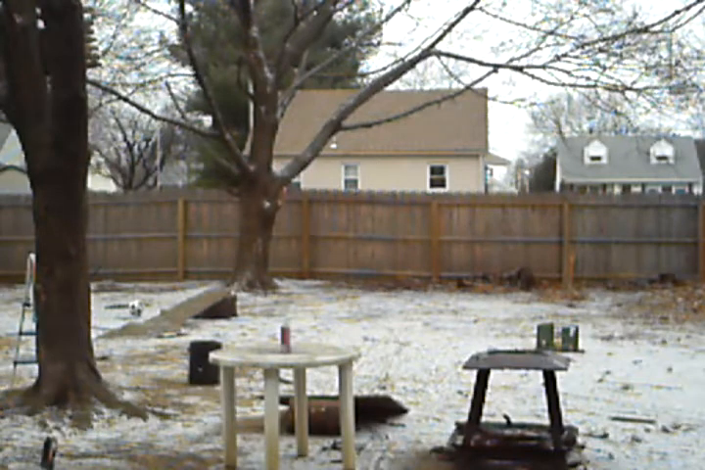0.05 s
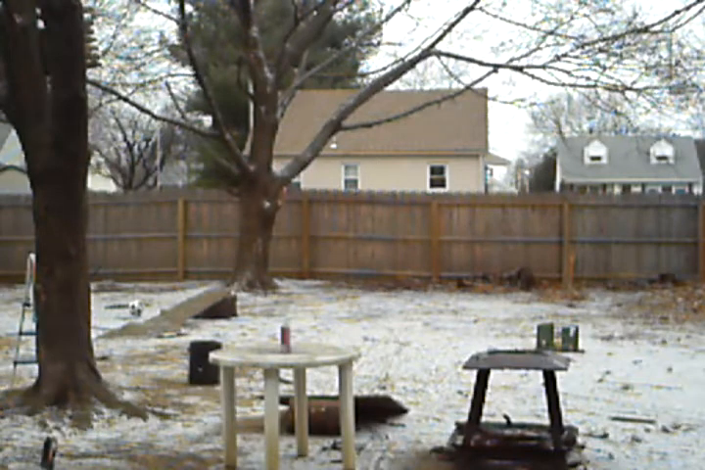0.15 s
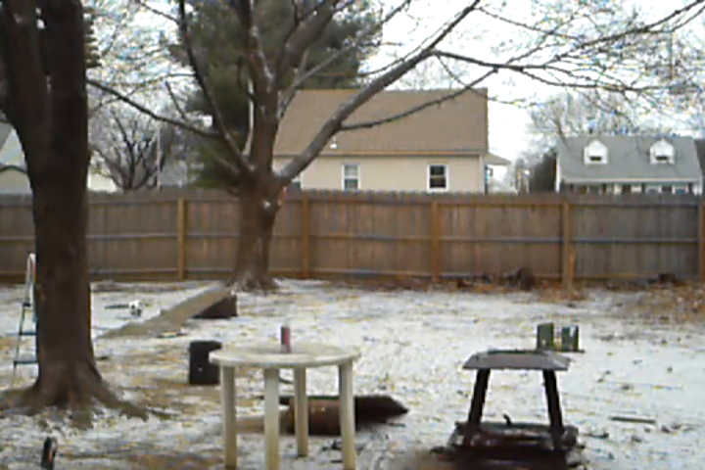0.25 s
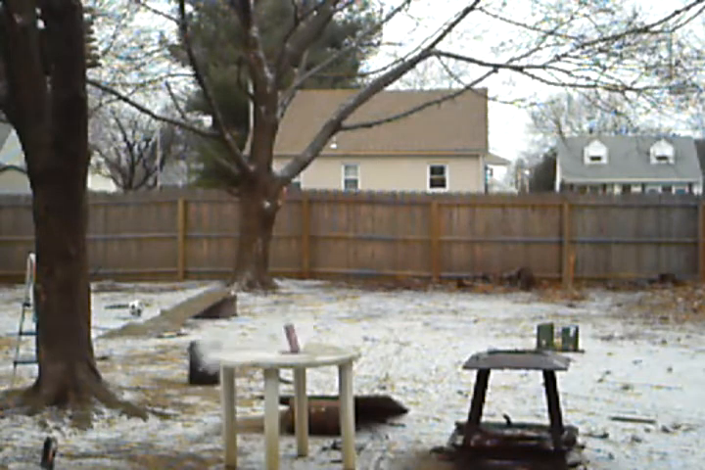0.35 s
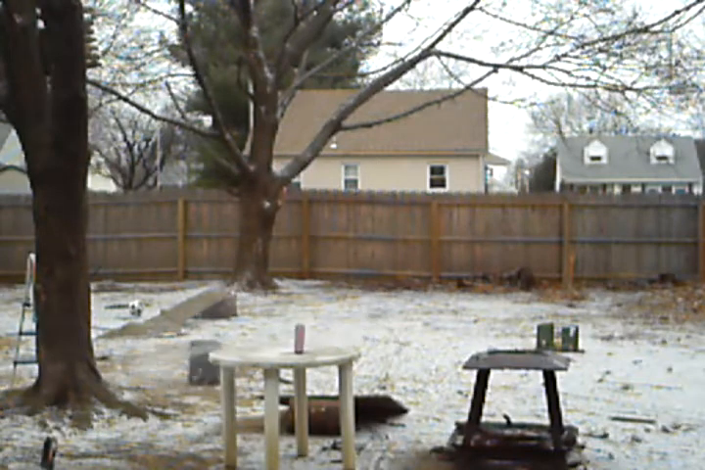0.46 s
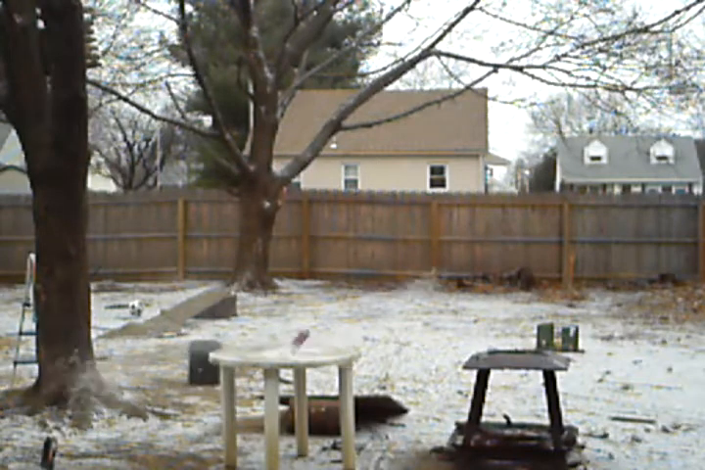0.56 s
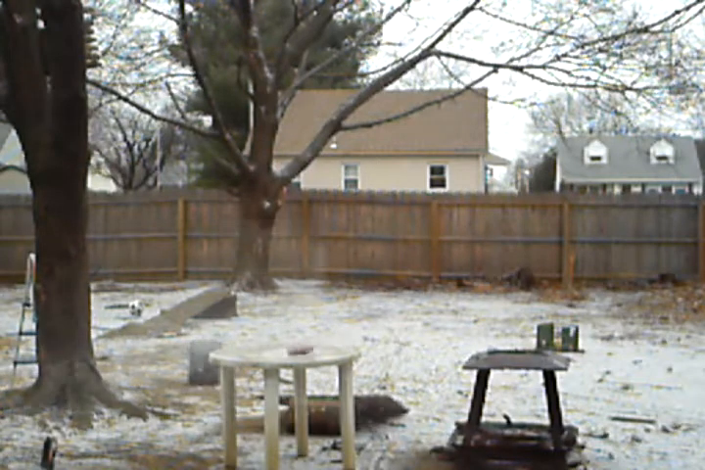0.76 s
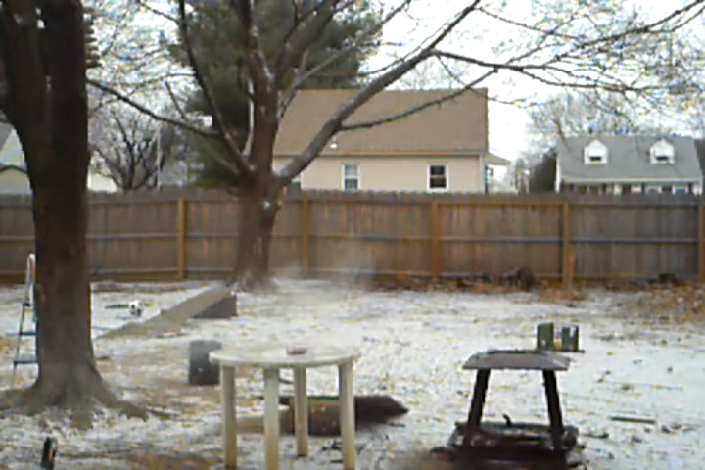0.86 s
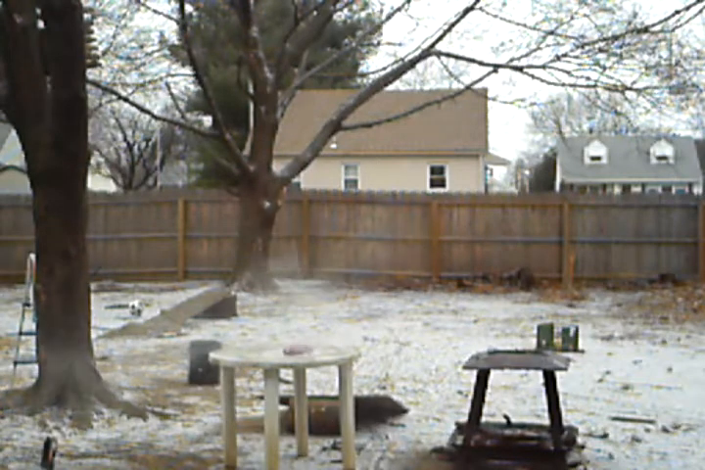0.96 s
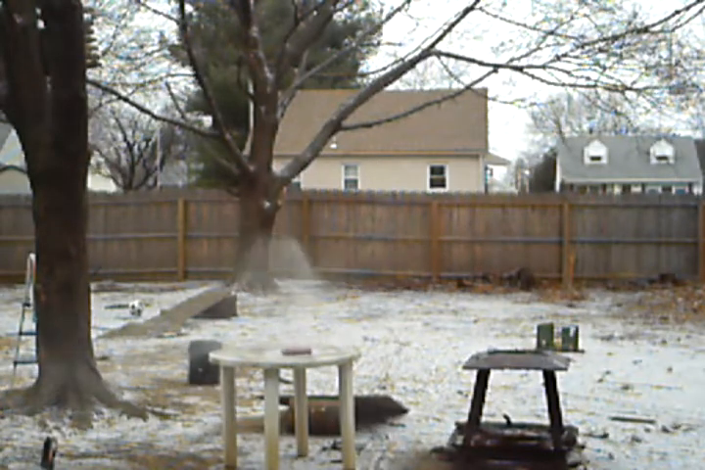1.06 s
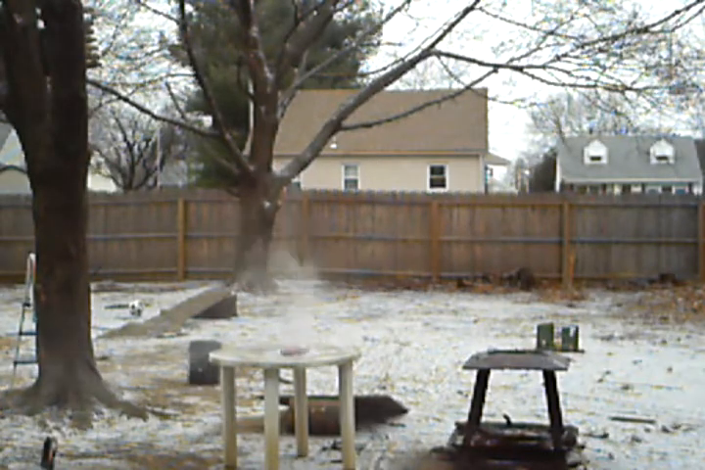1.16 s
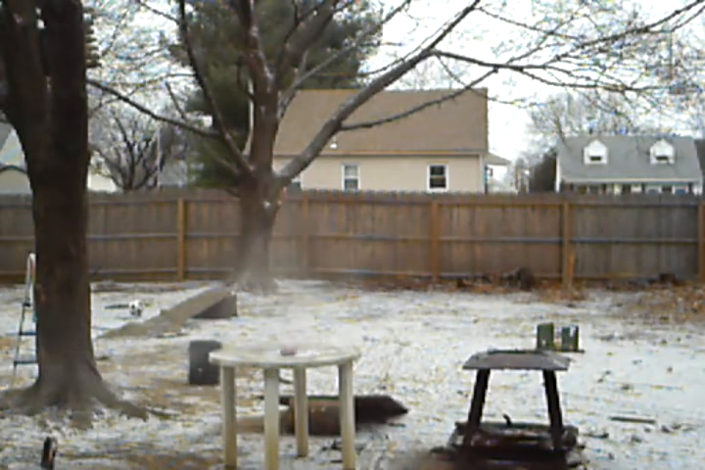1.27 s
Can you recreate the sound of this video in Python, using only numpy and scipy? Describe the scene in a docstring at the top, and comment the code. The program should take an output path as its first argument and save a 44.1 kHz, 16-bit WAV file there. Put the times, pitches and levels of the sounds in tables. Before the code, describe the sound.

Loud air rifle crack in an open back yard, slapping off fence and houses and fading quickly; a thin gas hiss, two light hollow can knocks and a dull crunch follow, on a dull, clipping microphone.

```python
"""Snowy back yard: a spring air gun is fired at an aerosol can standing on a plastic table.
The trigger ticks; lead-in noise, crack and echoes off fence and houses are shaped noise with pressure pulses.
The pierced can hisses (coloured noise), tips over and knocks on the table (ringing modes, clattering grains).
A dull crunch of ringing grains follows, over faint air noise and a wavering hum.
A narrow-band microphone overloads on the crack."""
import sys
import numpy as np
from scipy import signal
from scipy.io import wavfile

SR = 44100
rng = np.random.default_rng(int(sys.argv[2]) if len(sys.argv) > 2 else 0)


def transcribe(u):
    """Save the signal u as a 16-bit wav file named by the first command-line argument.

    u: samples, shape (n,) or (channels, n), limited to [-1, 1]; the rate is SR.
    q: integer samples, one column per channel.
    """
    v = np.clip(np.atleast_2d(u).T, -1, 1)
    q = np.round(v * 32767).astype(np.int16)
    wavfile.write(sys.argv[1], SR, q)


N = 57330
TIME_S = np.arange(N) / SR


def from_db(db):
    """Decibels to amplitude gain."""
    return 10 ** (np.asarray(db) / 20)


def rms_one(x):
    """Scale to rms 1."""
    return x / np.sqrt(np.mean(x ** 2) + 1e-20)


def level(rows, start_s):
    """Gain curve from (time_s, level_db) rows, faded in over 44 ms from start_s."""
    time_s, level_db = np.transpose(rows)
    fade_in = np.clip((TIME_S - start_s) / 0.044, 0, 1)
    return from_db(np.interp(TIME_S, time_s, level_db)) * fade_in


def at_hz(points, hz):
    """Interpolate a (hz, value) table on a log-frequency axis."""
    table_hz, value = np.array(points).T
    return np.interp(np.log(hz), np.log(table_hz), value)


def dying(start_s, t60_s, rise_s=0.00054):
    """Linear rise times exponential decay, 60 dB per t60_s."""
    age_s = np.maximum(TIME_S - start_s, 0)
    return np.clip(age_s / rise_s, 0, 1) * from_db(-60 * age_s / t60_s)


def drift(rate_hz):
    """Slow random wander: noise through a two-pole lowpass, rms 1 after its first second is dropped."""
    pole = np.exp(-2 * np.pi * rate_hz / SR)
    wander = signal.lfilter([1], [1, -2 * pole, pole * pole], rng.standard_normal(N + SR))
    return rms_one(wander[SR:])


def white():
    """White noise, rms about 1."""
    return rng.standard_normal(N)


def grains(per_s, spread_db):
    """Random clicks of uneven size and either sign; rms 1."""
    sizes = from_db(spread_db * np.minimum(rng.exponential(1, N), 4))
    signed = sizes * rng.choice([-1, 1], N)
    return rms_one(signed * (rng.random(N) < per_s / SR))


def ring(clicks, hz, t60_s):
    """Two-pole resonator: a unit click starts a decaying sine of height 1."""
    radius, angle = from_db(-60 / (t60_s * SR)), 2 * np.pi * hz / SR
    feedback = [1, -2 * radius * np.cos(angle), radius * radius]
    return signal.lfilter([0, np.sin(angle)], feedback, clicks + 1e-18)


def ringing_grains(per_s, low_hz, high_hz, cycles):
    """Uneven grains dealt to twelve resonances, each dying 60 dB in the given cycles; rms 1."""
    clicks, dealt = grains(per_s, 1.6), rng.integers(0, 12, N)
    pitches_hz = np.geomspace(low_hz, high_hz, 12)
    rings = sum(ring(clicks * (dealt == k), hz, cycles / hz) for k, hz in enumerate(pitches_hz))
    band = signal.butter(2, [0.76 * low_hz, 1.47 * high_hz], "band", fs=SR, output="sos")
    return rms_one(signal.sosfilt(band, rings))


def coloured(source, spectrum, shape=lambda hz: 1):
    """Colour two unrelated draws by half-octave bands, each shaped in time; near rms 1 at shape 1."""
    edges_hz = 20 * 2 ** np.arange(0, 9, .5)
    draws, out, power = [source(), source()], 0, 0
    for k, (low, high) in enumerate(zip(edges_hz, edges_hz[1:])):
        centre_hz = np.sqrt(low * high)
        gain = from_db(at_hz(spectrum, centre_hz))
        band = signal.butter(2, [low, high], "band", fs=SR, output="sos")
        out = out + gain * signal.sosfilt(band, draws[k % 2] * shape(centre_hz))
        power += gain ** 2 * (min(high, 6000) - min(low, 6000)) * 2 / SR  # counts only up to 6 kHz
    return out / np.sqrt(power)


# air noise spectrum: hz, relative_db_per_hz
AIR_SPECTRUM = [(12, -37), (20, -5.5), (129, -2), (148, -32), (202, -3), (270, -9.5), (700, -17.5),
                (889, -15.5), (2480, -25), (6000, -27), (7800, -79.5), (13200, -120)]
AIR_DB = -44.5


def air():
    """Background air: coloured noise, each band wandering in level."""
    return from_db(AIR_DB) * coloured(white, AIR_SPECTRUM, lambda hz: from_db(2.54 * drift(5.9)))


# hum level: time_s, rms_db
HUM_LEVEL = [(0.0, -40), (0.1, -69), (0.126, -44.5), (0.17, -47), (0.256, -44), (0.3, -45), (0.626, -40.5),
             (0.724, -52.5), (0.84, -42), (0.944, -54), (1.086, -56.5), (1.114, -66), (1.266, -68),
             (1.3, -64)]
HUM_HZ, HUM_WAVER_RATIO = 55, .04


def hum():
    """Low sine, wavering in pitch and level."""
    pitch_hz = HUM_HZ * (1 + HUM_WAVER_RATIO * drift(15))
    tone = np.sin(2 * np.pi * np.cumsum(pitch_hz) / SR)
    return np.sqrt(2) * level(HUM_LEVEL, -1) * tone  # sounding from the start


# dull crunch level: time_s, rms_db
CRUNCH_LEVEL = [(1.07, -50), (1.08, -52), (1.102, -46), (1.128, -44.5), (1.196, -37.5), (1.212, -44),
                (1.234, -35), (1.272, -47.5), (1.29, -35), (1.3, -39)]
# crunch resonances: pitch_hz, relative_db, t60_s
CRUNCH_MODES = [(112, -10, 0.063), (225.4, -8, 0.18), (320, 0.5, .05), (410, -2.5, .06), (479, 1, 0.047),
                (511, 3.5, 0.072), (669, -4, 0.069), (785, -9, 0.067), (1450, -8, .025)]
CRUNCH_GRAINS_PER_S = 900


def crunch():
    """Uneven grains, each exciting a random half or so of the dull resonances."""
    clicks = grains(CRUNCH_GRAINS_PER_S, 1.6)
    dealt = rng.random((len(CRUNCH_MODES), N)) < .5
    rings = sum(from_db(db) * ring(clicks * chosen, hz, t60_s)
                for chosen, (hz, db, t60_s) in zip(dealt, CRUNCH_MODES))
    return level(CRUNCH_LEVEL, 1.06) * rms_one(rings)


# can venting level: time_s, level_db
GAS_LEVEL = [(0.42, -38.5), (0.454, -50.5), (0.498, -42.5), (0.564, -47.5), (0.696, -45.5), (1.02, -48.5),
             (1.046, -53.5), (1.258, -47.5), (1.3, -56)]
# jet spectrum: hz, relative_db_per_hz
JET_SPECTRUM = [(180, -46), (300, -23), (410, -29), (437, -3), (477, 7), (927, -2), (4910, 6), (6000, 3),
                (7800, -42), (13200, -120)]
GAS_START_S = 0.353


def gas_hiss():
    """Gas jet of the pierced can: coloured turbulence noise, bands wandering in level."""
    jet = coloured(white, JET_SPECTRUM, lambda hz: from_db(1.0 * drift(6.5)))
    return level(GAS_LEVEL, GAS_START_S) * jet


# can rocking and rolling: start_s, rms_db, t60_s
CLATTERS = [(.482, -45, 0.13), (0.683, -38, 0.25), (.731, -44, 0.32), (1.06, -41.5, 1)]
RATTLE_PER_S, RATTLE_LOW_HZ, RATTLE_HIGH_HZ, RATTLE_CYCLES = 3600, 664, 1914, 4.7


def clatter():
    """Rocking, rolling can: dense ringing grains under decaying envelopes."""
    envelope = sum(from_db(db) * dying(start_s, t60_s, 0.001) for start_s, db, t60_s in CLATTERS)
    return envelope * ringing_grains(RATTLE_PER_S, RATTLE_LOW_HZ, RATTLE_HIGH_HZ, RATTLE_CYCLES)


# can knocks on the table: start_s, relative_db, pitch_hz
KNOCKS = [(.483, -30, 1240), (.6762, -21.5, 1148), (0.6792, -25.5, 1177), (0.73, -37, 1430),
          (1.0587, -21.5, 1084), (1.063, -28, 1140)]
# can and table modes: pitch_ratio, relative_db, t60_s
CAN_MODES = [(.66, -11, .015), (.82, -5, .02), (1.0, 0, .028), (1.2, -4, .022), (1.5, -9, .015)]


def knocks():
    """Each impact click rings the modes of can and table, alternating in sign."""
    out = np.zeros(N)
    for start_s, knock_db, pitch_hz in KNOCKS:
        click = 1. * (np.arange(N) == int(start_s * SR))
        rings = sum((-1) ** k * from_db(mode_db) * ring(click, pitch_hz * ratio, t60_s)
                    for k, (ratio, mode_db, t60_s) in enumerate(CAN_MODES))
        out += from_db(knock_db - 4.5) * rings
    return out


TRIGGER_S, TRIGGER_DB, TRIGGER_RISE_S, TRIGGER_T60_S = .1865, -26, 0.0029, 0.025
TRIGGER_HZ, TRIGGER_WIDTH_HZ, TRIGGER_RING_DB = 3880, 220, 11.5
TRIGGER_THUD_DB, TRIGGER_THUD_HZ = -43.5, 800


def trigger():
    """Bright noise tick through one broad metal resonance, plus a dull, slower-dying stir of the action."""
    burst = white() * dying(TRIGGER_S, TRIGGER_T60_S, TRIGGER_RISE_S)
    b, a = signal.iirpeak(TRIGGER_HZ, TRIGGER_HZ / TRIGGER_WIDTH_HZ, fs=SR)
    tick = burst + from_db(TRIGGER_RING_DB) * signal.lfilter(b, a, burst)
    b, a = signal.butter(2, [TRIGGER_THUD_HZ / 2, TRIGGER_THUD_HZ * 2], "band", fs=SR)
    thud = rms_one(signal.lfilter(b, a, white())) * dying(TRIGGER_S, 0.63, 0.012)
    return from_db(TRIGGER_DB) * tick + from_db(TRIGGER_THUD_DB) * thud


# late slaps off metal and far walls: start_s, relative_db, t60_s
SLAPS = [(0.3678, -15, 0.026), (0.3746, -16, 0.041), (0.411, -18.5, 0.035), (0.4123, -23, 0.02),
         (0.4788, -21, 0.016)]
# slap resonances: pitch_hz, width_hz, relative_db
SLAP_MODES = [(953, 35, 4), (1260, 75, 5), (2110, 52, 1), (2414, 40, 3), (2720, 35, 1), (3020, 36, -4),
              (3950, 87, -18.5), (4470, 91, -2), (4900, 190, 3.5)]
SLAP_LOW_HZ, SLAP_RING_DB = 930, 8.5


def slaps():
    """Thin late reflections: highpassed noise bursts plus narrow resonances."""
    burst = white() * sum(from_db(db - 7.5) * dying(start_s, t60_s) for start_s, db, t60_s in SLAPS)
    burst = signal.sosfilt(signal.butter(4, SLAP_LOW_HZ, "high", fs=SR, output="sos"), burst)
    out = burst.copy()
    for hz, width_hz, db in SLAP_MODES:
        b, a = signal.iirpeak(hz, hz / width_hz, fs=SR)
        out += from_db(db + SLAP_RING_DB) * signal.lfilter(b, a, burst)
    return out


SHOT_S = .2362  # air leaves the muzzle
# far wash spectrum: hz, relative_db_per_hz
FAR_SPECTRUM = [(59, -48.5), (100, -20), (545, -32), (822, -14), (943, -3.5), (1870, -9), (4890, -8.5),
                (6000, -17), (7800, -63.5), (13200, -120)]
FAR_DB, FAR_T60_S = -31, 0.98


def far_wash():
    """Farther reverberation: coloured noise, slow rise, long decay, bands wandering in level."""
    def shape(hz):
        return dying(SHOT_S, FAR_T60_S, 0.028) * from_db(1.4 * drift(25))
    return from_db(FAR_DB) * coloured(white, FAR_SPECTRUM, shape)


# blast spectrum, crack and scatter alike: hz, relative_db_per_hz
BLAST_SPECTRUM = [(30, -27.5), (90, -7), (160, -8.5), (600, -8.5), (1270, -11.5), (2260, -14), (2760, -10),
                  (3450, -13), (4910, -7), (6000, -8.5), (7800, -62), (13200, -120)]
# yard scatter decay: hz, t60_s
SCATTER_T60 = [(40, .2), (150, 0.36), (500, 0.38), (1500, 0.44), (3000, 0.23), (5500, 0.33)]
SCATTER_DB, SCATTER_PER_S, SCATTER_RISE_S = -15, 4000, .002


def scatter():
    """Dense small yard echoes: coloured grains with a decay per band."""
    def shape(hz):
        return dying(SHOT_S, at_hz(SCATTER_T60, hz), SCATTER_RISE_S)
    return from_db(SCATTER_DB) * coloured(lambda: grains(SCATTER_PER_S, 2.0), BLAST_SPECTRUM, shape)


PUSH_DB, PUSH_S, PUSH_T60_S = -16, .008, .1  # PUSH_S: length of the first, positive part


def push():
    """Muzzle-air pressure: a quick positive push, then longer suction, in widening, dying swings."""
    age = np.maximum(TIME_S - SHOT_S, 0) / PUSH_S
    return from_db(PUSH_DB) * np.sin(np.pi * np.sqrt(age)) * dying(SHOT_S, PUSH_T60_S, 0.0034)


# crack and separate echoes: start_s, relative_db, t60_s
CRACKS = [(.2360, 1, .012), (.2380, 4, .02), (.2410, 1, .02), (.2432, -3, .02), (.2457, -3, .02),
          (.2485, -2, .03), (.2540, -4, .025), (.2578, -2, .025), (.2645, -8, .02), (.2685, -1, .03),
          (.281, -6, .05), (.301, -10, .035), (.3265, -13, .035)]
FRONT_S, FRONT_DB = .0003, -2


def fronts():
    """N-shaped pressure pulse opening the crack and each echo."""
    out = np.zeros(N)
    for start_s, db, _ in CRACKS:
        inside = (TIME_S > start_s) & (TIME_S < start_s + FRONT_S)
        out += from_db(db + FRONT_DB) * inside * (1 - 2 * (TIME_S - start_s) / FRONT_S)
    return out


LEAD_IN_S, LEAD_IN_DB, LEAD_IN_GAIN_DB = .228, -25, 10  # start, level there, growth up to the shot
CRACK_DB = -10.5


def lead_in_and_cracks():
    """Blast-coloured noise: lead-in swelling for 8 ms up to the shot, then the decaying crack and echoes."""
    progress = np.clip((TIME_S - LEAD_IN_S) / (SHOT_S - LEAD_IN_S), 0, 1)
    leading_in = (TIME_S > LEAD_IN_S) & (TIME_S < SHOT_S)
    lead_in = leading_in * from_db(LEAD_IN_DB + LEAD_IN_GAIN_DB * progress)
    cracks = sum(from_db(db + CRACK_DB) * dying(start_s, t60_s) for start_s, db, t60_s in CRACKS)
    return coloured(white, BLAST_SPECTRUM, lambda hz: lead_in + cracks)


def scene():
    """Sum of all sources at one microphone."""
    background = air() + hum() + crunch()
    can = gas_hiss() + clatter() + knocks()
    reflections = slaps() + far_wash() + scatter()
    gun = trigger() + push() + fronts() + lead_in_and_cracks()
    return (background + can + reflections + gun)[None]


MIC_CUT_HZ, OVERLOAD, OFFSET = 5738, 0.68, -0.0057
CUTOFF_HZ = 16600


def record(dry):
    """Narrow microphone lowpass, hard clipping, slight DC offset, final lowpass."""
    mic_filter = signal.cheby2(14, 70, MIC_CUT_HZ * 1.137, fs=SR, output="sos")  # stopband edge
    narrow = signal.sosfilt(mic_filter, dry)
    overloaded = np.clip(narrow, -OVERLOAD, OVERLOAD) + OFFSET
    return signal.sosfilt(signal.cheby2(16, 60, CUTOFF_HZ, fs=SR, output="sos"), overloaded)


dry = scene()
out = record(dry)
transcribe(out)
```